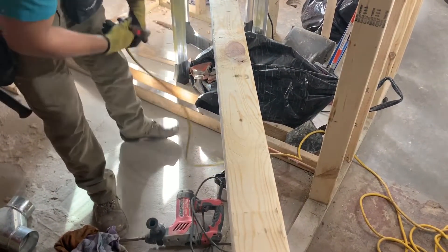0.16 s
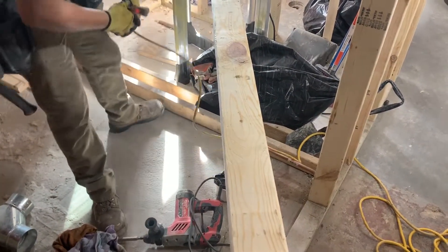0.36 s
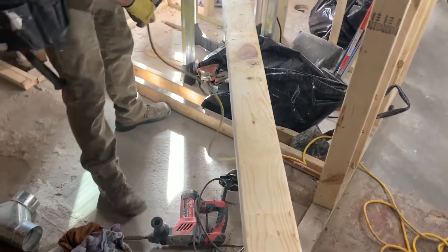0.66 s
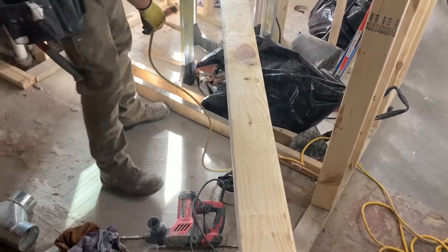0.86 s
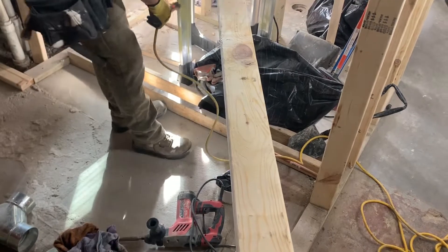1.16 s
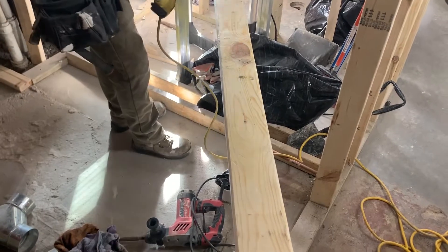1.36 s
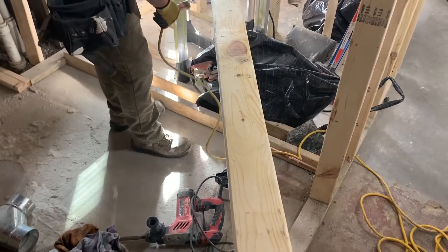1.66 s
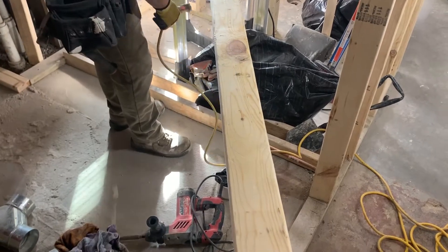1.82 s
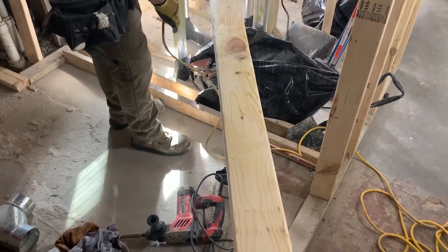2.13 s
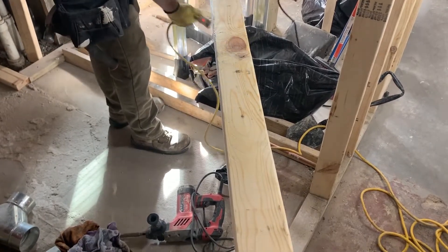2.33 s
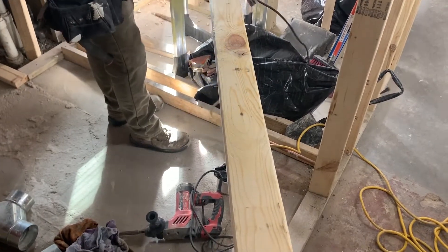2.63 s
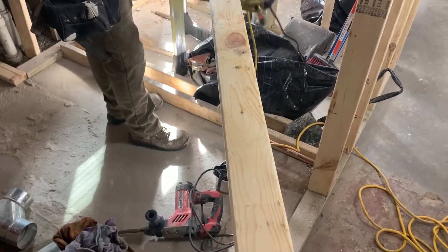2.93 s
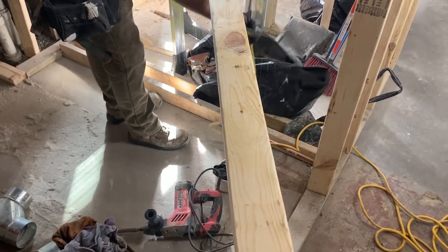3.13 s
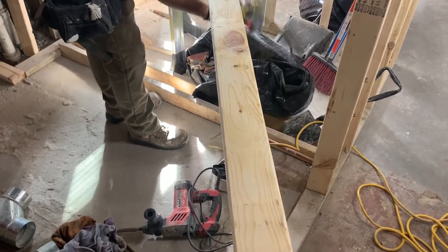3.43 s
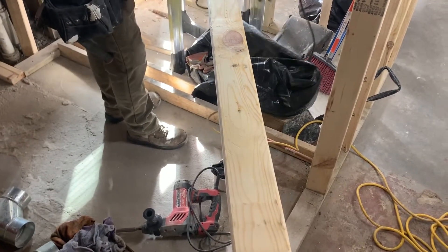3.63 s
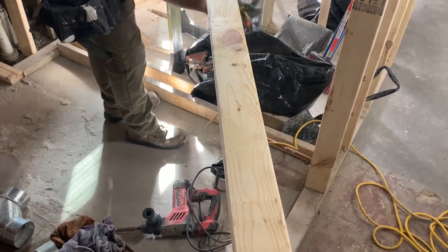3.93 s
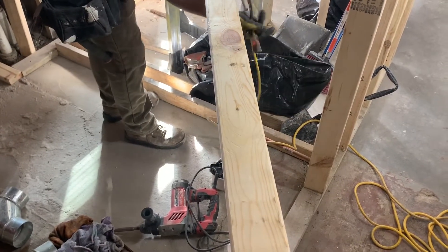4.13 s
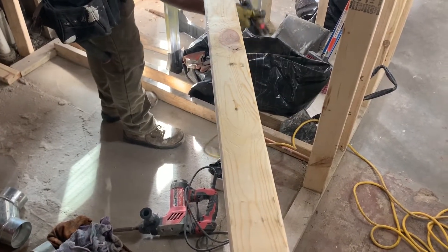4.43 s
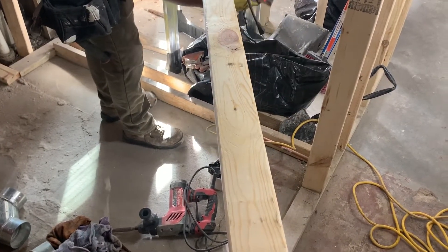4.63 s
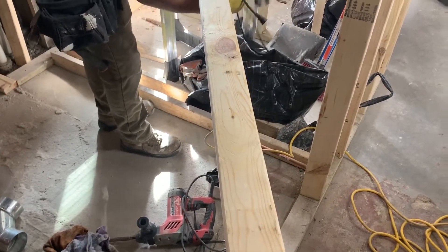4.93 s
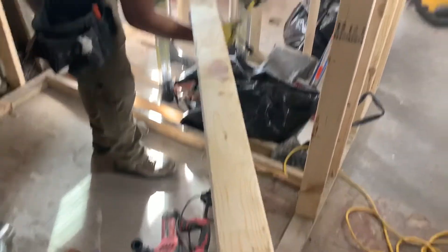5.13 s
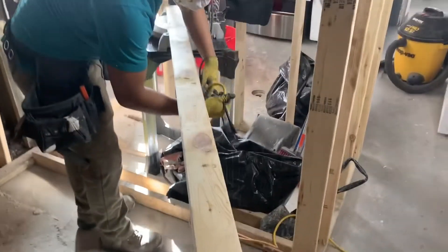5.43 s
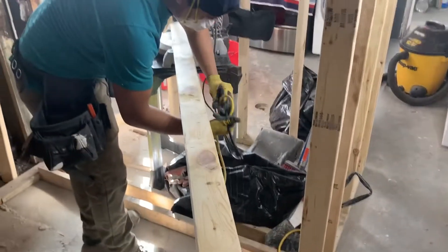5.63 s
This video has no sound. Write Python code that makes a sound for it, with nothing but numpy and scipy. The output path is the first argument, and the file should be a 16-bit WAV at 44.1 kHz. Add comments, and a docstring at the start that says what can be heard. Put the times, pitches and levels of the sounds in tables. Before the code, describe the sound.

Inside a bare timber-framed room, a worker handles an extension cord. Faint scrapes, small wooden knocks and crisp ticks come first, then it nearly falls quiet. A sharp slip and louder knocks follow, with brighter hissing drags and rattles that later thin out. Hits echo briefly; a low rumble stays underneath. Stereo microphone at moderate distance.

```python
"""An extension cord pulled over a board

In a bare timber-framed room a cord slides with a hiss, knocks on the wood and snaps small bright ticks.
Sliding is shaped noise, knocks ring the board's own tones, and ticks are very short tones with a snap.
The room echoes the hits; the floor shudders, and a low rumble from far off and faint air fill the room.
The right channel hears the treble much as the left does, but slightly earlier."""
import sys
import numpy as np
from scipy import signal
from scipy.fft import rfft, irfft, next_fast_len
from scipy.io import wavfile
from scipy.ndimage import uniform_filter1d

SR = 44100
rng = np.random.default_rng(int(sys.argv[2]) if len(sys.argv) > 2 else 0)


def transcribe(signal):
    """Save signal, clipped to [-1, 1], as a 16-bit WAV file at the path in sys.argv[1]."""
    frames = np.atleast_2d(signal).T
    limited = np.clip(frames, -1, 1)
    pcm = np.round(limited * 32767).astype(np.int16)
    wavfile.write(sys.argv[1], SR, pcm)


N = 254456


def gain_of(db):
    """Turn decibels into a plain multiplier."""
    return 10 ** (np.asarray(db) / 20)


def evened(x):
    """Scale a sound to an average (RMS) strength of 1."""
    return x / np.sqrt(np.mean(x ** 2) + 1e-20)


def read(points, hz):
    """Read a curve of (pitch, value) points at any pitch, with pitch on a log scale."""
    point_hz, value = np.transpose(points)
    return np.interp(np.log(hz + 1), np.log(point_hz + 1), value)


def add(mix, start_s, sound):
    """Add a sound into the mix at its start time, cut off where the mix ends."""
    part = mix[..., round(start_s * SR):][..., :sound.shape[-1]]
    part += sound[..., :part.shape[-1]]


def noise(spectrum, size, patchy_db, flicker_db):
    """Two unrelated channels of random short-time spectra, with drifting patches and a flicker over all bands."""
    frames, hz = 4 * N // size + 5, np.fft.rfftfreq(size, 1 / SR)
    a, b, c, d, patches = rng.standard_normal((frames, len(hz), 5)).T
    # patches spread over 5 neighbouring bands and 16 frames of time
    patches = uniform_filter1d(patches, size=5, axis=0)
    patches = evened(uniform_filter1d(patches, size=16, axis=1))
    flicker = evened(uniform_filter1d(rng.standard_normal(frames), size=5))
    level_db = read(spectrum, hz)[:, None] + patchy_db * patches + flicker_db * flicker
    spectra = np.array([a + 1j * b, c + 1j * d]) * gain_of(level_db)
    sound = signal.istft(spectra, nperseg=size, noverlap=3 * size // 4)[1]
    return evened(sound[:, :N])


def sliding():
    """Sheath on wood: fine hiss, duller scrape and low drag; steady strokes plus sudden slips that die away."""
    # strokes of the cord: top_s, swell_s, fade_s, hiss_db, rub_db (the duller rub, before it is divided)
    strokes = [(.0, 0.021, 0.071, -80, -55), (.13, 0.13, .12, -66.5, -58.5),
               (.26, 0.11, 0.12, -63.5, -64.5), (.38, 0.12, 0.14, -72, -56.5),
               (.45, 0.051, 0.12, -60.5, -60), (.64, 0.25, 0.29, -64, -58.5),
               (.865, .03, 0.047, -66, -65.5), (.915, 0.024, 0.069, -66, -62.5),
               (.955, 0.04, 0.11, -72, -65.5), (1.09, 0.035, 0.12, -62, -57.5),
               (1.18, 0.089, .12, -60, -53), (1.28, .1, 0.6, -82, -70), (1.78, 0.073, 0.3, -77.5, -86),
               (2.13, 0.21, 0.81, -54.5, -96), (2.33, 0.081, 0.42, -60, -56),
               (2.44, 0.084, 0.97, -43.5, -48.5), (2.78, .3, 0.33, -53, -50), (2.98, 0.34, 0.4, -43, -60.5),
               (3.118, 0.07, 0.36, -41, -40.5), (3.45, 0.13, 0.25, -48, -51.5),
               (3.57, 0.22, 0.12, -45, -42), (3.708, 0.36, 0.21, -46.5, -44.5),
               (3.86, 0.26, 0.43, -74, -53), (4.11, 0.061, 1, -52, -74), (4.27, 0.16, 0.18, -51, -49),
               (4.38, 0.27, 0.31, -43.5, -51), (4.58, 0.083, 0.14, -60, -65),
               (4.68, 0.19, 0.16, -81, -50.5), (4.81, 0.22, 0.49, -59.5, -56),
               (5.02, 0.094, 0.36, -60.5, -56), (5.16, 0.17, 0.14, -50.5, -54),
               (5.31, 0.18, 0.17, -47, -53), (5.45, 0.32, 0.37, -66, -54.5),
               (5.62, 0.088, 0.18, -42, -56.5)]
    # sudden slips: start_s, level_db, t60_s (time to fall 60 dB), dull (0 all hiss, 1 all scrape and drag)
    slips = [(0.326, -52.5, 0.33, 0), (.8415, -61, 0.28, 0.1), (.944, -61.5, 0.27, 0.4),
             (1.076, -62.5, 0.33, 0), (1.136, -45, 0.15, 0), (1.198, -57.5, 0.27, 0.97),
             (2.3986, -43.5, 0.23, 0.42), (2.665, -37, 0.11, 0.82), (3.0864, -36, 0.69, 0.58),
             (4.0755, -54, 0.11, 0.04), (4.188, -43.5, 0.14, 0.73), (5.576, -55, 0.31, 0)]
    # levels between the strokes: hiss_db, scrape_db, drag_db
    rest_db = [-85.5, -95, -72]
    # colours of the three noises: pitch_hz, level_db (per Hz; only the shape counts)
    hiss_colour = [(300, -60), (1500, -6), (4000, -0.5), (7000, -1), (9000, 4), (12000, 0), (15000, 3),
                   (16500, -33)]
    scrape_colour = [(500, -35), (1100, -1.5), (2000, 3.5), (3200, 1), (5000, -5.5), (7000, -11),
                     (12000, -73)]
    drag_colour = [(120, -11), (220, -7), (340, 2), (700, -6), (1200, -2), (2200, -13.5), (5000, -36)]
    edge_db, roundness = -35.5, 1.865  # a stroke is this far down one swell before and one fade after its top
    scrape_db, drag_db = -2, -1.5  # how the rub divides
    slip_drag_db = -3  # how much of a slip's dull part drags

    now = np.arange(N) / SR
    powers = gain_of(rest_db)[:, None] ** 2 * np.ones(N)
    for top_s, swell_s, fade_s, hiss_db, rub_db in strokes:
        distance = abs(now - top_s) / np.where(now < top_s, swell_s, fade_s)
        shape_db = edge_db * distance ** roundness
        top_db = np.array([[hiss_db], [rub_db + scrape_db], [rub_db + drag_db]])
        powers = powers + gain_of(shape_db + top_db) ** 2
    hiss_level, scrape_level, drag_level = np.sqrt(powers)

    t = np.arange(SR // 2) / SR
    for start_s, level_db, t60_s, dull in slips:
        burst = gain_of(level_db - 60 * t / t60_s) * (1 - np.exp(-t / 0.00075))
        add(hiss_level, start_s, (1 - dull) * burst)
        add(scrape_level, start_s, dull * burst)
        add(drag_level, start_s, gain_of(slip_drag_db) * dull * burst)

    hiss = hiss_level * noise(hiss_colour, size=256, patchy_db=2.0, flicker_db=1.0)
    # the grain of the wood catches about 200 times a second
    catches = np.minimum(rng.exponential(1, N), 2.5) * (rng.random(N) < 200 / SR)
    grit = 1 + uniform_filter1d(30 * catches, size=60)
    scrape = scrape_level * evened(grit) * noise(scrape_colour, size=256, patchy_db=3.0, flicker_db=-0.25)
    drag = drag_level * noise(drag_colour, size=512, patchy_db=3.0, flicker_db=3.1)
    return hiss + scrape + drag


def knocks():
    """A blow and its small bounces crack drily and ring those tones of the board within the blow's reach."""
    # knocks on wood: start_s, peak_db (before pan, bass cut and mix), centre_hz, spread_octaves, rattle_s,
    # ring (multiplies the board's t60_s), pan_db (first dry channel over the second)
    blows = [(.002, -24, 1280, 0.56, 0.028, 0.89, 0), (0.13, -27, 505, 0.61, 0.0067, 0.38, 0),
             (.212, -36.5, 610, 0.55, 0.0026, 0.68, 5), (.351, -35, 1260, 0.094, 0.013, 1.7, 2),
             (.566, -42.5, 1620, 1.3, 0.036, 0.71, 3), (1.083, -45.5, 830, 1.2, 0.065, 0.46, 8),
             (1.129, -30.5, 604, 1.1, 0.011, 0.6, -0.5), (1.14, -40, 1600, 1.34, 0.006, 1.6, 23),
             (1.202, -48, 1520, 2.1, 0.0099, 0.51, 12), (1.771, -53, 1390, 1.3, 0.045, 0.84, -1),
             (2.298, -47, 900, 0.92, 0.063, 4.9, 2), (2.411, -38, 875, 0.4, 0.04, 1.5, -1),
             (2.665, -19, 1350, 1.3, 0.017, 1.14, -1), (2.787, -16.5, 830, 0.71, 0.021, 0.81, 1),
             (2.935, -25, 820, 0.8, 0.021, 0.75, 4), (3.093, -34.5, 390, 0.8, 0.043, 1.7, 2),
             (3.521, -22.5, 650, 0.61, 0.012, 0.21, 4), (3.545, -23.5, 1820, 1.16, 0.01, 0.11, -1),
             (3.737, -21, 1340, 0.77, 0.014, 0.97, -0.5), (3.749, -31, 664, 0.56, 0.016, 1.1, 10),
             (4.02, -35.5, 720, 1.1, 0.01, 1.5, 3), (4.189, -24, 1050, 0.88, 0.026, 1.2, 2.5),
             (4.368, -30.5, 600, 0.66, 0.016, 0.72, 1.5), (4.598, -36, 516, 0.26, 0.059, 0.28, 5),
             (4.7, -37, 1210, 1.7, 0.022, 0.53, 1), (4.79, -51, 1664, 0.32, 0.019, 1.6, 3),
             (5.091, -35.5, 794, 0.35, 0.009, 1.8, 0), (5.463, -32.5, 800, 0.42, 0.029, 1.94, 0.5)]
    # tones the board rings with: pitch_hz, level_db, t60_s (time to fall 60 dB, before ring)
    board = [(343, -2, 0.042), (433, 14, 0.017), (652, -1.5, 0.081), (816, 1.5, 0.035), (874, 2, 0.019),
             (1102, 5.5, 0.02), (1323, 12.5, 0.0071), (1605, 7, 0.021), (1747, -3, 0.021), (2230, 5, 0.06),
             (3060, 1, 0.046), (4480, 15, 0.0079)]
    size = 4096
    out, t = np.zeros((2, N)), np.arange(size) / SR
    mode_hz, mode_db, mode_t60_s = np.transpose(board)[:, :, None]
    bins_hz = np.fft.rfftfreq(size, 1 / SR) + 1

    for start_s, peak_db, centre_hz, spread_octaves, rattle_s, ring, pan_db in blows:
        def reach(hz):
            """How strongly the blow excites a pitch; it falls off more steeply on the bass side."""
            octaves = np.log2(hz / centre_hz) / max(spread_octaves, .1)
            return gain_of(-np.where(hz < centre_hz, 9., 5.) * octaves ** 2)

        # only rare large random values become bounces
        luck = rng.standard_normal(size)
        bounces = luck * (abs(luck) > 2.3) * np.exp(-(t / rattle_s) ** 3)
        bounces *= 1.5 / np.linalg.norm(bounces)  # together about twice the energy of the first blow
        bounces[0] = 1

        crack = evened(irfft(rfft(rng.standard_normal(size)) * reach(bins_hz)))
        crack *= np.exp(-t / 0.0042) * (1 - np.exp(-t / 0.0011))

        # where the blow lands shifts each tone a little
        spot = 1 + .008 * rng.standard_normal((len(board), 1))
        fading = gain_of(mode_db - 60 * t / (mode_t60_s * ring))
        modes = reach(mode_hz) * fading * np.sin(2 * np.pi * mode_hz * spot * t)
        ringing = modes.sum(0)

        sound = signal.fftconvolve(bounces, ringing / abs(ringing).max() + 0.43 * crack)
        sound *= gain_of(peak_db) / abs(sound).max()
        add(out, start_s, sound * gain_of([[pan_db / 2], [-pan_db / 2]]))
    # the knocks carry no bass below about 270 Hz
    return signal.sosfilt(signal.butter(4, 270, "high", fs=SR, output="sos"), out)


def ticks():
    """Each tick of plug or sheath is a few quick cycles over a broad snap."""
    # bright ticks: start_s, level_db (of the tone, before its decay and the mix), pitch_hz
    tick_list = [(0.325, -34.5, 10400), (0.598, -43, 10100), (0.704, -43, 9800), (0.858, -36.5, 9500),
                 (0.9093, -32.5, 14600), (0.9438, -37, 11800), (0.9546, -37, 14300), (1.1393, -53, 10800),
                 (1.1963, -25, 8700), (1.2007, -44, 10000), (1.329, -56, 7120), (3.763, -22, 11000),
                 (3.964, -52, 7700), (5.4023, -31, 7530)]
    out, t = np.zeros(N), np.arange(200) / SR
    for start_s, level_db, pitch_hz in tick_list:
        tone = np.sin(2 * np.pi * pitch_hz * t) * np.exp(-t / 0.00057)
        # differences between neighbouring noise samples favour the treble
        snap = np.diff(rng.standard_normal(200), prepend=0) * np.exp(-t / 0.0022)
        add(out, start_s, gain_of(level_db) * (tone + 0.26 * snap))
    return out


def room(hits):
    """The hands move about, so the hits drift among three different echo patterns."""
    turn = 2 * np.pi * 1.3 * np.arange(N) / SR  # 1.3 turns a second
    echoed = np.zeros((2, N))
    for k in range(3):
        # the squares of the three shares always add up to 1
        share = np.sqrt(2 / 3) * np.cos(turn + k * np.pi / 3)
        echoed += signal.oaconvolve(hits * share, tail(), axes=1)[:, :N]
    return echoed


def tail():
    """Sparse echoes of random sign, one in every 20 samples, each band dying at its own speed."""
    # how long the room echoes: pitch_hz, t60_s (time to fall 60 dB)
    echo_t60 = [(200, 0.7), (700, 0.37), (2000, 0.24), (5000, 0.11), (12000, 0.06)]
    taps = np.zeros((2, SR // 2))
    at = np.arange(200, SR // 2 - 20, 20)
    at = at + rng.integers(0, 20, (2, len(at)))
    np.put_along_axis(taps, at, rng.choice([-1., 1.], at.shape), 1)
    hz, t, spectra = signal.stft(taps, SR, nperseg=256)
    fading = gain_of(-60 * t / read(echo_t60, hz)[:, None])
    echoes = signal.istft(spectra * fading, SR, nperseg=256)[1]
    return echoes / np.linalg.norm(echoes[0])


def floor_shudders():
    """The floor shudders under a shifted weight: low noise that swells in a moment and dies away."""
    # shudders: start_s, level_db, t60_s (time to fall 60 dB)
    shudders = [(0.0, -41, 0.54), (.13, -45, 0.63), (1.13, -57, 0.34), (3.085, -42, 0.64), (3.53, -41, .5)]
    # colour of the floor noise: pitch_hz, level_db (per Hz; only the shape counts)
    floor_colour = [(50, -20), (80, 8.5), (130, -1.5), (230, -2.5), (330, -10), (600, -47)]
    level, t = np.zeros(N), np.arange(SR // 2) / SR
    for start_s, level_db, t60_s in shudders:
        add(level, start_s, gain_of(level_db - 60 * t / t60_s) * (1 - np.exp(-t / 0.011)))
    return level * noise(floor_colour, size=2048, patchy_db=-2.5, flicker_db=0.0)


def background():
    """Three noises: a deep throb, a hum above it and the faint air of the room at a fixed level."""
    # how the rumble rises and falls: time_s, throb_db, hum_db
    rumble = [(0.0, -84, -51), (0.11, -45.5, -50.5), (0.32, -61, -48), (1.11, -52, -50.5),
              (4.32, -67.5, -50), (4.82, -54, -52), (5.21, -67, -49.5), (5.43, -52, -53), (5.77, -63, -48)]
    # colours of the three noises: pitch_hz, level_db (per Hz; only the shape counts)
    throb_colour = [(25, -23), (36, 0), (46, 11), (56, 5.5), (70, -28), (90, -50.5)]
    hum_colour = [(32, -67), (55, -2), (97, -3), (125, -11), (227, -18.5), (280, -27), (542, -47),
                  (700, -40), (910, -76), (1540, -120)]
    air_colour = [(260, -8), (450, -2), (726, -26), (782, 0), (818, -22), (993, -0.5), (1090, -15),
                  (1240, -2.5), (1420, 0.5), (1600, -22), (2620, -13), (2910, -16), (16000, -44)]
    air_db = -74.5
    time_s, throb_db, hum_db = np.transpose(rumble)
    now = np.arange(N) / SR
    throb_level = gain_of(np.interp(now, time_s, throb_db))
    hum_level = gain_of(np.interp(now, time_s, hum_db))
    throb = throb_level * noise(throb_colour, size=4096, patchy_db=1.8, flicker_db=-1.5)
    hum = hum_level * noise(hum_colour, size=2048, patchy_db=0.95, flicker_db=0.4)
    air = gain_of(air_db) * noise(air_colour, size=2048, patchy_db=5.5, flicker_db=2.3)
    return throb + hum + air


def scene():
    """Mix the hits, their echoes, the sliding cord and the low sounds into two dry channels."""
    hits = knocks() + ticks()
    heard_hits = gain_of(-2.5) * hits + gain_of(-6.0) * room(hits)
    return heard_hits + sliding() + floor_shudders() + background()


def record(dry):
    """The right channel shares part of the left's sound, slightly earlier; then a bass cut and a treble limit."""
    # how alike the two channels are: pitch_hz, likeness (0 unrelated, 1 the same)
    likeness = [(40, 0.97), (90, 0.94), (250, 0.83), (600, 0.38), (2000, 0.052), (5500, 0.022),
                (6600, 0.83), (8000, 1), (16000, 1)]
    lead_s = 1 / 4840  # how much earlier the right channel hears the shared sound
    treble_turn = -1.69  # radians added to the right channel from 5 kHz up
    bass_cut_hz, treble_limit_hz = 35.0, 15900

    size = next_fast_len(N + 4096)
    left, own = rfft(dry, size)
    hz = np.fft.rfftfreq(size, 1 / SR)
    same = read(likeness, hz)
    phase = 2 * np.pi * hz * lead_s + np.interp(hz, [0, 900, 2500, 5000], [0, .35, 0, treble_turn])
    right = same * left * np.exp(1j * phase) + np.sqrt(1 - same ** 2) * own
    bass_cut = 1 / np.sqrt(1 + (bass_cut_hz / (hz + 1)) ** 12)
    pair = irfft(np.array([left, right]) * bass_cut, size)[:, :N]
    treble_limit = signal.firwin(511, treble_limit_hz, window=("kaiser", 9), fs=SR)
    return signal.oaconvolve(pair, treble_limit[None], "same")


dry = scene()
out = record(dry)
transcribe(out)
```